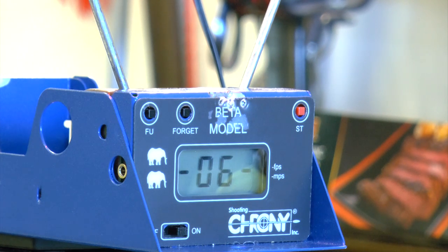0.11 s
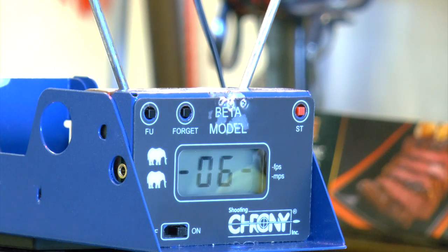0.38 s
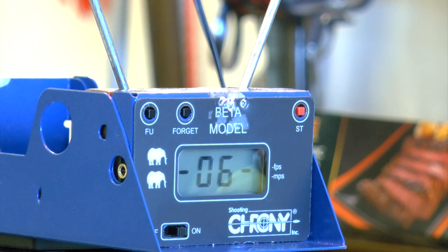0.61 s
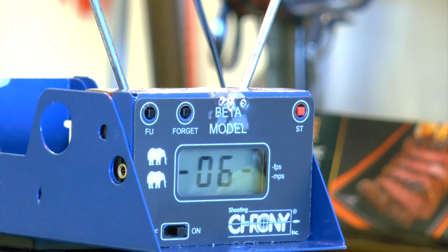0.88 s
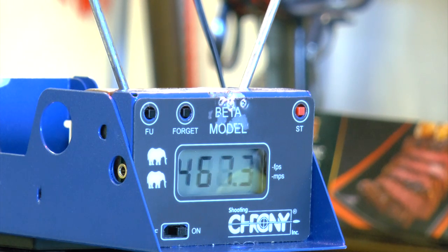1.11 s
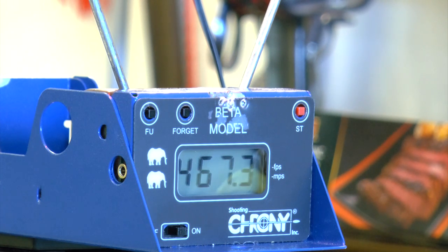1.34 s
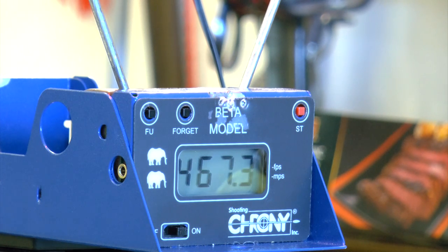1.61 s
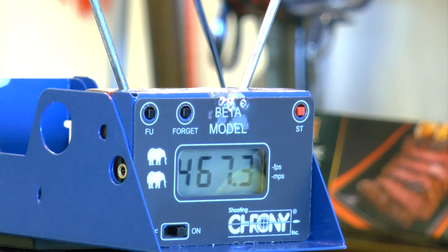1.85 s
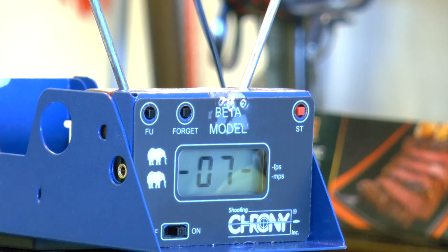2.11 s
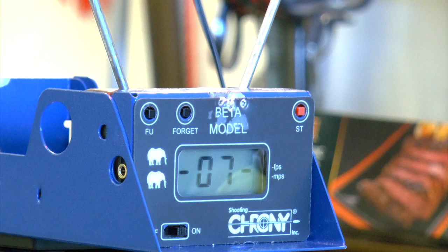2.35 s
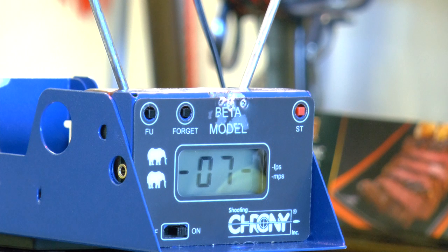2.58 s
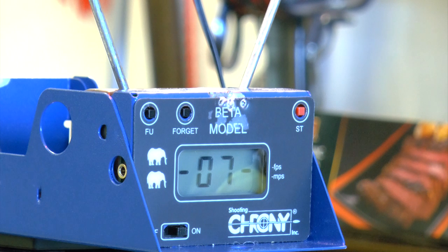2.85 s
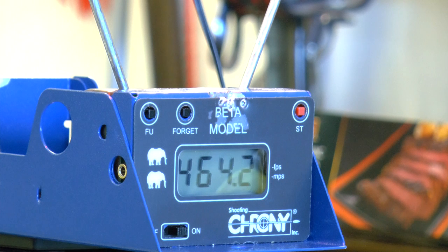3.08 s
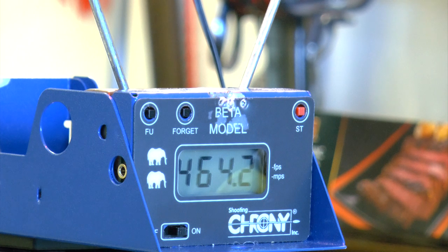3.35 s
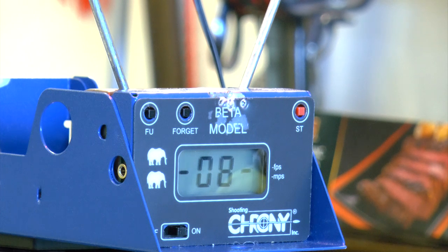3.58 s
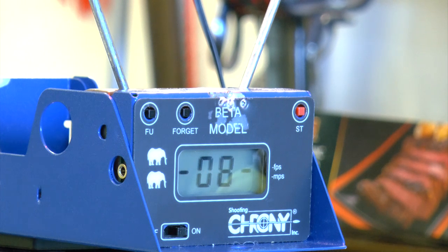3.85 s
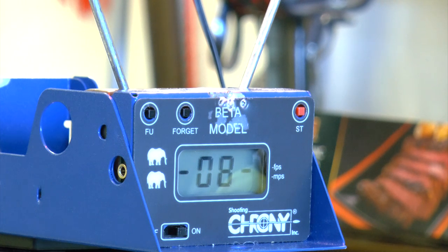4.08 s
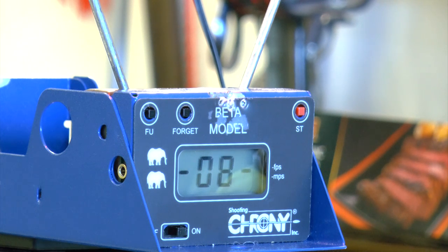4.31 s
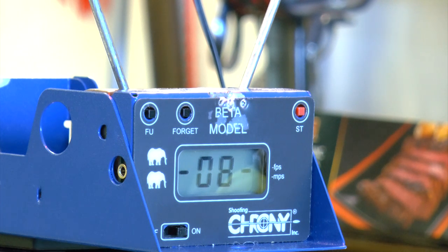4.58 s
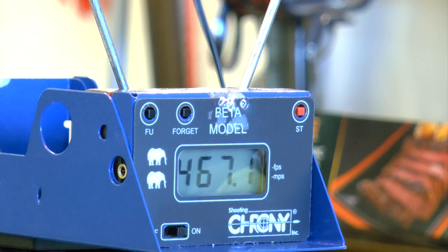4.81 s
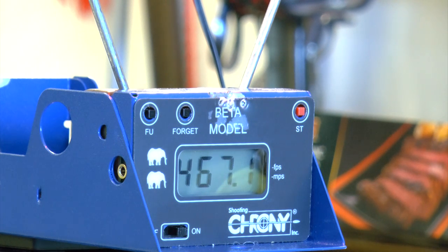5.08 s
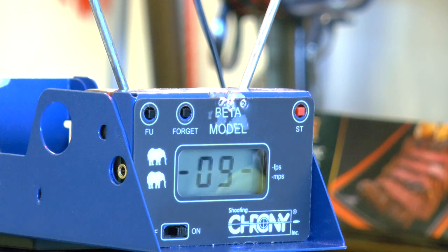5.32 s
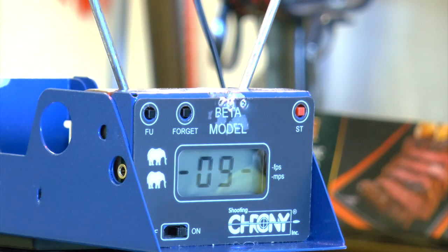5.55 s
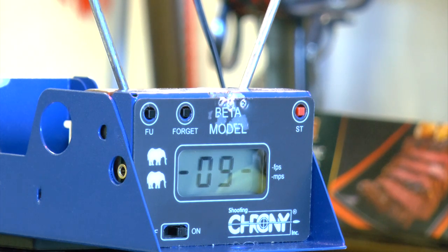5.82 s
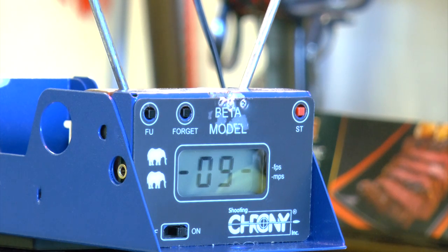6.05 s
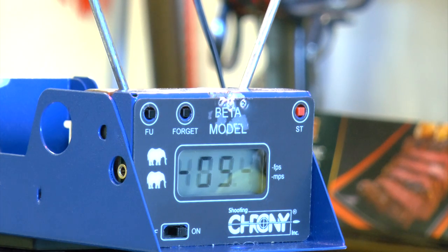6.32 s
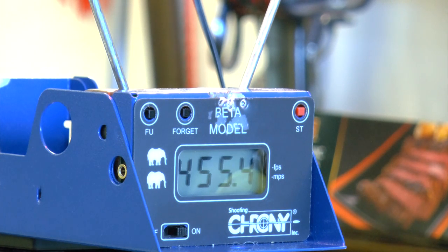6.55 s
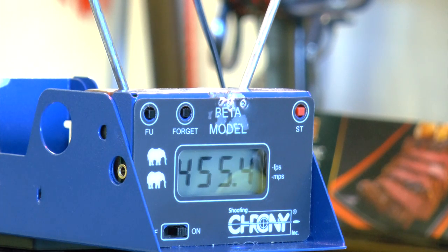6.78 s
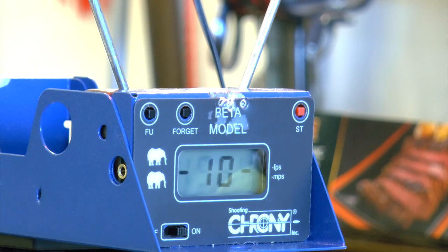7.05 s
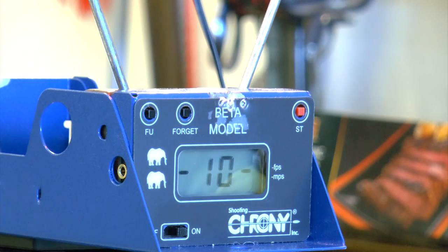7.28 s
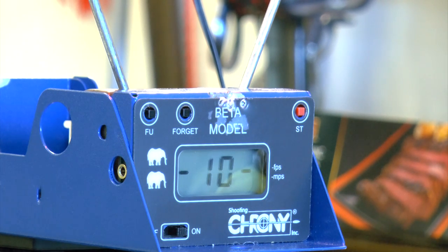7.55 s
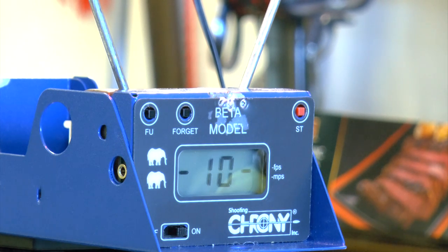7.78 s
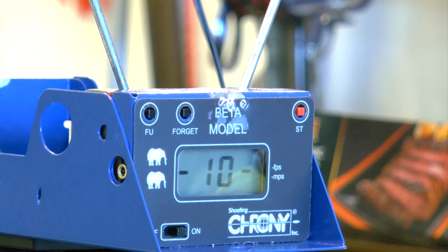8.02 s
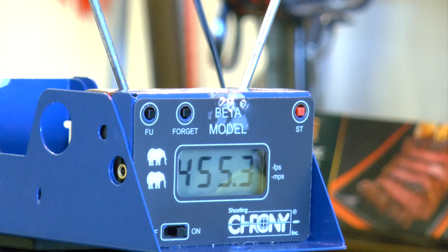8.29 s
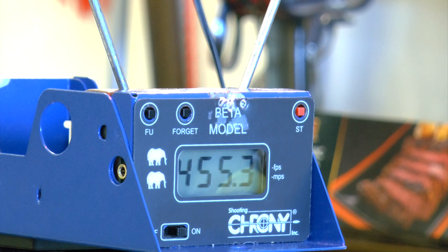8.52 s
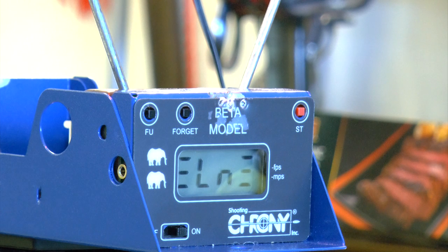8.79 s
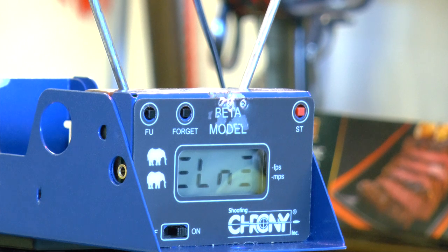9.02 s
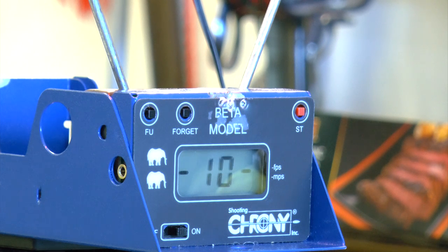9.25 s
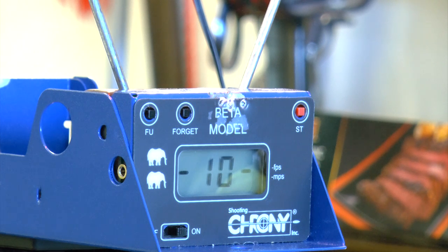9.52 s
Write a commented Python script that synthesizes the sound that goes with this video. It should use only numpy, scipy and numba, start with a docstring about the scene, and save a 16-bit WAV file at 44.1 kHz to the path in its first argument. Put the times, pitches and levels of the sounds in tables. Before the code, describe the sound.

A gas pistol is fired close to stereo microphones in a hard-walled shed, above a faint, steady rumble of distant machinery with a slight motor tone and hiss. The first crack comes almost immediately, at 0.04 s: bright, dry and hard, with a low gas puff and a short, dense reverberation. At 0.27 s the trigger resets with a crisp click. Tiny grip ticks follow. Near-identical shots come at 1.96, 3.57, 5.27, 7.08 and 9.10 s, each clicking again about a quarter second later. The puff leans left at first, right on the last shot. After the second shot, faint knocks run from 2.35 to 2.63 s; after the fourth, clearer tinny pings and wooden taps from 5.67 to 6.01 s; after the fifth, a small ring at 7.43 s and a dull tap; after the last, a sharper knock near 9.57 s. Quiet handling ticks occupy the gaps.

```python
"""A gas pistol fires six shots close to a pair of microphones in a hard-walled shed; machines hum far off throughout.
Each shot starts with a hammer click and muzzle crack, made of short noise bursts, and a puff of gas, a pressure swing.
About a quarter second later the trigger resets: a tick of noise, a short wash after it and a ring of the frame.
After four of the shots the spent ball bounces off metal and wood: noise thuds and wavering struck tones.
In the pauses the hand shifts on the grip with faint ticks. Fading noise makes the shed's reverberation."""
import sys
import numpy as np
from scipy import signal
from scipy.fft import rfft, irfft, next_fast_len
from scipy.io import wavfile
from scipy.ndimage import uniform_filter1d
from numba import njit

SR = 44100
rng = np.random.default_rng(int(sys.argv[2]) if len(sys.argv) > 2 else 0)


def volts(x):
    """Linear amplitude factor 10**(x/20) for a level x in dB, scalar or array-like."""
    e = np.asarray(x, float) / 20
    return 10 ** e


def waveform_to_disk(signal):
    """Save audio, clipped to [-1, 1], as 16-bit WAV at the path in sys.argv[1]."""
    frames = np.transpose(np.atleast_2d(signal))
    scaled = np.clip(frames, -1, 1) * 32767
    samples = np.round(scaled).astype(np.int16)
    wavfile.write(sys.argv[1], SR, samples)


N = 425124  # length in samples

# All levels are relative. left_minus_right_db is positive when the left is louder.
# A burst's rise_ms is the time from its start to its peak; t60_s is the time to fade by 60 dB.
SIDES = np.array([[1], [-1]])  # left, right

# the six shots and their gas puffs: start_s, puff_level_db, puff_left_minus_right_db
SHOTS = [(0.0429, -12.5, 14.5), (1.9601, -6.5, 8.5), (3.571, -9, 7.5), (5.2670, -4, 6), (7.0810, -6, 1),
         (9.1003, -5.5, -11)]
# bursts inside one shot: after_shot_ms, level_db, pitch_hz, width_hz, rise_ms, left_minus_right_db
SHOT_PARTS = [(0, -7.5, 5800, 4300, 1.1, -7), (0.891, -1, 7400, 3400, .5, -4),
              (3.338, 0, 4920, 200, 0.57, 7), (4.963, -17, 556, 140, 2.25, 17),
              (4.2, 0, 9540, 2200, 0.48, -11.5), (4.437, -3.5, 2690, 2110, 2.49, -3.5),
              (5.427, -6.5, 6700, 3000, 3.1, 0.5), (0.553, -14.5, 14100, 3400, 7.4, -5.5),
              (7.345, -22.5, 3100, 18000, 2.5, 1), (23.17, -25.5, 810, 260, 7, 15)]
# sharp first reflections of the shot, with the same columns:
# after_shot_ms, level_db, pitch_hz, width_hz, rise_ms, left_minus_right_db
SHOT_ECHOES = [(10.2, -7, 9500, 4000, .3, -3), (15.3, -2.5, 7500, 9000, .25, -4),
               (22.9, -1.5, 4500, 4000, .35, 0)]
SHOT_DB, SHOT_SCATTER = -4.5, .3  # added to every part's level; amount of new noise in each shot

# pressure swing of the gas puff: after_arrival_ms, width_ms, share (signed, no unit)
PUFF_SWING = [(0, .55, -.7), (1.7, .85, 1), (4.2, 1.1, -.65), (8.1, 1.6, .22)]
PUFF_DELAY_MS = 5.7
GUST_DB, GUST_WIDTH_HZ, GUST_RISE_MS = -18, 240, 8.3

# trigger snapping back: start_s, level_db, frame_ring_db
RESETS = [(0.2749, -15, -22), (2.2078, -14, -41), (3.8083, -15.5, -35), (5.5178, -12.5, -22),
          (7.3231, -14.5, -25.5), (9.3621, -14, -22.5)]
RESET_TILT_DB = 2.5  # brightness, per octave
# hand shifts and faint ticks of the mechanism: start_s, level_db, brightness_db_per_octave
SHIFTS = [(0.6871, -39.5, -6), (0.9304, -48, 2.3), (0.9827, -46, 3.5), (1.0192, -50, 0), (1.3539, -49, 3),
          (2.7754, -46, -2), (2.9968, -44.5, -0.5), (3.0058, -42.5, 5), (3.3039, -52.5, -0.5),
          (4.199, -46, -7), (4.4249, -43.5, 8), (4.4692, -49.5, -3.5), (4.508, -41.5, -1.6),
          (6.112, -48.5, -3.7), (6.203, -42.5, 3), (8.3573, -40, 0.5), (8.4073, -41, -2.2),
          (8.6028, -45, 4)]
SHIFT_RING_DB, RING_PER_TILT = -22, -1.34  # duller shifts ring the frame more: dB per dB of brightness
# basic tone colour of a click: pitch_hz, gain_db
CLICK_COLOUR = [(1000, -25), (2000, 6), (4000, 4.5), (7000, 1.5), (10000, 1), (13000, -6.5), (16000, -16)]
# hard surfaces near the pistol, relative to the tick: delay_ms, level_db, left_minus_right_db
CLICK_ECHOES = [(5.6, -2.5, 0), (11.2, -1.5, -1)]
WASH_DB, WASH_RISE_MS = -18, 13.4  # a short wash of noise follows each tick
# ringing tones of the pistol frame: pitch_hz, level_db, t60_s
FRAME = [(2155, 0, 0.11), (1806, -7, 0.096), (2444, -7.5, 0.14), (3570, -9, 0.03)]

# the ball on dull surfaces: start_s, level_db, thud_pitch_hz, tick_over_thud_db
KNOCKS = [(2.4034, -44, 11000, -16), (2.449, -36, 1370, -12), (2.565, -36, 1260, -5),
          (2.6272, -27.5, 2250, -20.5), (5.7778, -25.5, 2510, -9.5), (5.8692, -38.5, 920, -5),
          (6.0107, -37.5, 2000, -12), (7.55, -46, 2000, -9), (9.5711, -30.5, 4440, -6),
          (9.5776, -20, 4360, -12)]
THUD_WIDTH, THUD_CYCLES = 1.3, 1.4  # width as a share of the pitch; rise in cycles of the pitch
TICK_HZ, TICK_WIDTH_HZ, TICK_RISE_MS = 7800, 11000, 1
# short tones of a struck board: multiple_of_thud_pitch (no unit), level_db, t60_cycles of the thud pitch
BOARD = [(.45, -20, 40), (.78, -15, 80), (1.05, -12, 80), (1.5, -17, 70), (2.3, -21, 110)]
# ringing tones of four metal things the ball strikes: pitch_hz, level_db, t60_s
CAN = [(3325, -1, .19), (5865, -15, .15), (6545, -2, .25), (8120, -9, .25), (9945, 0, .13),
       (11490, -18, .15), (12890, -10, .17), (15090, -16, .12), (15515, -16, .1)]
PLATE = [(3610, 6, 0.163), (3600, -4, 0.11), (4900, -30.5, .12), (6600, 2, 0.065), (9800, -19, .05),
         (10060, 3, .05)]
RODS = [(2169, -2, .2), (3700, -11, .2), (4100, -9, .15), (5030, -11, .08), (6200, -10, .12),
        (8915, -9, .13), (9600, -10, .1), (10000, -9, .07), (11070, -12, .1), (12000, -14, .12),
        (15180, -16, .1)]
BRACKET = [(6400, 1, .1), (7200, -6, 0.11), (10000, -9, 0.036), (13950, -11, 0.13)]
# the ball on metal: start_s, object (tone table), level_db, brightness_db_per_octave
BLOWS = [(2.3535, PLATE, -52.5, -2), (2.521, BRACKET, -47, -3), (5.6715, CAN, -29.5, -3.7),
         (5.8929, RODS, -44, 2), (5.9289, RODS, -37.5, 1.2), (7.4335, CAN, -33, -2.8),
         (9.4943, PLATE, -47.5, 2.3), (9.5776, PLATE, -38.5, -12)]
# floor and walls near the ball: delay_ms, level_db
BALL_ECHOES = [(3.6, -4), (8.3, -6), (14.5, -11)]

# reverberation of the shed: pitch_hz, t60_s, level_db, side_minus_mid_db
SHED = [(100, 0.17, -31, 4), (295, 0.57, -8.5, -14), (890, 0.77, -11.5, -5), (1070, 0.87, -5, -11),
        (2000, 0.73, -10, -8), (3430, 0.65, -8.5, -10.5), (4800, 0.6, -10, -17.5), (5840, 0.6, -12.5, -18),
        (9000, 0.5, -11.5, -8), (11860, 0.4, -13.5, -1.5), (16000, 0.42, -18.5, -2.5)]
NEAR_DB, NEAR_T60_S = 2, 0.28  # things close by scatter a first, short wash: level over the long tail
# uneven scatter of near sound by the microphones' casing: pitch_hz, relative_side_db
CASING = [(60, -3.5), (110, -1), (200, -5.5), (380, 4.5), (700, -9.5), (1290, -1.5), (2380, -8),
          (4400, -13), (8120, -9), (15000, 7)]
# the table top under the microphones lifts and hollows the low middle: pitch_hz, gain_db
TABLE_TOP = [(200, 0.5), (350, -2), (550, -2.5), (780, 4.5), (1000, -9), (1300, -10.5), (1900, -2),
             (4200, -1.5), (5000, -0.5), (6500, -1.5)]

# broad machine rumble: pitch_hz, level_db per Hz
HUM = [(15, -46.5), (25, -14.5), (76, -8), (145, -4), (206, -2), (256, -7.5), (293, -4), (516, -14),
       (560, -7.5), (641, -22.5), (775, -18.5), (1290, -25), (1740, -19), (6920, -40.5), (16000, -45)]
HUM_DB = -51.5
# stereo width of the rumble: pitch_hz, relative_side_db
HUM_SIDE = [(60, -10), (110, -13), (200, -17), (380, -14.5), (700, -11.5), (1290, -18), (2380, -17),
            (4400, -24.5), (8120, -7.5), (15000, 0.5)]
# blurred motor tones and a band of hiss: pitch_hz, width_hz, level_db
MOTORS = [(44.3, 14, -65.5), (82, 29, -57.5), (205.4, 5.6, -59.5), (751, 96, -67), (1421, 40, -74.5),
          (2820, 1300, -67.5)]
WHINE_HZ, WHINE_DB = 551, -63  # one steadier motor tone

TOP_HZ = 15800  # the sound is cut above this


def curve(table, hz, column=1):
    """Read a table at any frequency, straight on a log axis."""
    rows = np.array(table, float)
    return np.interp(np.log(hz + 1), np.log(rows[:, 0] + 1), rows[:, column])


def colour(x, table):
    """Shape a sound by a table of pitch_hz and gain_db."""
    length = x.shape[-1]
    size = next_fast_len(length)
    gain = volts(curve(table, np.fft.rfftfreq(size, 1 / SR)))
    return irfft(rfft(x, size) * gain, size)[..., :length]


def band(x, hz, width_hz):
    """Keep a bell-shaped band of a sound, at rms 1."""
    f = np.fft.rfftfreq(x.shape[-1], 1 / SR)
    bell = np.exp(-2 * ((f - hz) / width_hz) ** 2)
    y = irfft(rfft(x) * bell, x.shape[-1])
    return y / y.std()


def add(out, s, sound):
    """Mix a sound in at a time in seconds."""
    i = int(s * SR)
    room = max(out.shape[-1] - i, 0)
    out[..., i:i + sound.shape[-1]] += sound[..., :room]


def pan(db):
    """Left and right gains from the left minus right level."""
    return volts(db / 2 * SIDES)


def walk(rate):
    """Slow random drift, spread 1, from smoothed random steps at a rate per second."""
    k = int(SR / rate)
    steps = np.repeat(rng.standard_normal(N // k + 1), k)
    smooth = uniform_filter1d(uniform_filter1d(steps, k), k)[:N]
    return smooth / smooth.std()


def repeat(x, echoes):
    """Add delayed copies of a sound, as reflections do."""
    out = x.copy()
    for ms, db in echoes:
        add(out, ms / 1000, volts(db) * x)
    return out


def burst(noise, hz, width_hz, rise_ms):
    """A quick swell of band noise with a set energy."""
    u = np.arange(len(noise)) / (rise_ms * SR / 1000)
    shape = u * np.exp(1 - u)
    y = shape * band(noise, hz, width_hz)
    return y * np.sqrt(np.sum(shape ** 2) / np.sum(y ** 2) / 2)


def pulse(hz, width_hz, rise_ms):
    """What a burst sends to the walls: the same energy with an even spectrum, as all directions add up."""
    y = band(signal.unit_impulse(1024, 128), hz, width_hz)
    return y * np.e * np.sqrt(rise_ms * SR / 8000 / len(y))


def ring(modes, tilt_db, rough=1.7):
    """Struck tones; each line wavers and widens at random."""
    t, out = np.arange(SR // 2) / SR, 0
    for hz, db, t60 in modes:
        swell, slip = (band(rng.standard_normal(len(t)), 0, 100.0) for _ in range(2))
        level = volts(db + tilt_db * np.log2(hz / 6000) - 60 * t / max(t60, .02))
        # an extra push at the start, then a wavering fade
        level = level * volts(3 * swell + 5 * np.exp(-t / .012))
        out = out + level * np.sin(2 * np.pi * hz * t + rough * slip)
    return out * np.minimum(t / 0.00039, 1)  # soft start


def shots():
    """Noise bursts, nearly alike in each shot; returns the direct sound and what reaches the walls."""
    out, send = np.zeros((2, N)), np.zeros(N)
    parts = SHOT_PARTS + SHOT_ECHOES
    usual = rng.standard_normal((len(parts), 2048))  # noise shared by all the shots
    for s, *_ in SHOTS:
        for (ms, part_db, hz, width, rise_ms, pan_db), noise in zip(parts, usual):
            start, gain = s + ms / 1000, volts(SHOT_DB + part_db)
            part = burst(noise + SHOT_SCATTER * rng.standard_normal(2048), hz, width, rise_ms)
            add(out, start, gain * pan(pan_db) * part)
            add(send, start, gain * pulse(hz, width + 1500, rise_ms))
    return out, send


def puffs():
    """The gas jet buffets each microphone port with a pressure swing and a low gust."""
    out, ms = np.zeros((2, N)), np.arange(1500) * 1000 / SR
    swing = 0
    for at, width, share in PUFF_SWING:
        swing = swing + np.exp(-.5 * ((ms - PUFF_DELAY_MS - at) / width) ** 2) * share
    for s, db, pan_db in SHOTS:
        add(out, s, volts(db) * pan(pan_db) * swing)
        for port in out:  # separate noise at each port
            gust = burst(rng.standard_normal(8192), 20, GUST_WIDTH_HZ, GUST_RISE_MS)
            add(port, s + .002, volts(GUST_DB) * gust)
    return out


def clicks():
    """Short ticks of the mechanism, each with echoes, a wash of noise and a ring of the frame."""
    out, send = np.zeros((2, N)), np.zeros(N)
    ticks = [(s, db, RESET_TILT_DB, ring_db) for s, db, ring_db in RESETS]
    ticks += [(s, db, tilt_db, SHIFT_RING_DB + RING_PER_TILT * tilt_db) for s, db, tilt_db in SHIFTS]
    for s, db, tilt_db, ring_db in ticks:
        shape = [(hz, d + tilt_db * np.log2(hz / 6000)) for hz, d in CLICK_COLOUR]
        # the tick itself, then its echoes, each with new noise
        for ms, echo_db, pan_db in [(0, 0, 0)] + CLICK_ECHOES:
            tick = colour(burst(rng.standard_normal(1024), 9300, 24000, 0.95), shape)
            add(out, s + ms / 1000, volts(db - 5.5 + echo_db) * pan(pan_db - 5.5) * tick)
        wash = colour(burst(rng.standard_normal(8192), 4500, 12000, WASH_RISE_MS), CLICK_COLOUR)
        add(out, s, volts(db + WASH_DB) * pan(-2.5) * wash)
        add(send, s, volts(db - 0.5) * colour(pulse(6700, 30000, 0.17), shape))
        frame = volts(db + ring_db) * ring(FRAME, 0, rough=2.2)
        add(out, s, volts(3.0) * pan(-2.0) * frame)
        add(send, s, frame)
    return out, send


def bounces():
    """The spent ball knocks on dull things and rings metal ones, a little left."""
    out, send = np.zeros(N), np.zeros(N)
    hits = [(s, db, hz, THUD_WIDTH * hz, 1000 * THUD_CYCLES / hz) for s, db, hz, _ in KNOCKS]
    ticks = [(s, db + tick_db) for s, db, _, tick_db in KNOCKS]
    ticks += [(s, db) for s, _, db, _ in BLOWS]
    hits += [(s, db, TICK_HZ, TICK_WIDTH_HZ, TICK_RISE_MS) for s, db in ticks]
    for s, db, hz, width, rise_ms in hits:
        add(out, s, volts(db) * burst(rng.standard_normal(2048), hz, width, rise_ms))
        add(send, s, volts(db + 1.0) * pulse(hz, width, rise_ms))
    for s, db, hz, _ in KNOCKS:
        body = [(hz * ratio, mode_db, cycles / hz) for ratio, mode_db, cycles in BOARD]
        add(out, s, volts(db) * ring(body, 0, rough=.8))
    out = repeat(out, BALL_ECHOES)
    for s, modes, db, tilt_db in BLOWS:
        metal = volts(db) * ring(modes, tilt_db)
        add(out, s, metal)
        add(send, s, volts(-10.0) * metal)
    return out * pan(1.3), send


def shed(x, build_ms):
    """Dense reflections build up quickly and fade faster in the treble than in the middle."""
    t, tail = np.arange(36000) / SR, 0
    for hz in 70 * 2 ** np.arange(0, 8, 1 / 3):  # third-octave steps
        mid, side = (band(rng.standard_normal(len(t)), hz, hz / 4) for _ in range(2))
        fade = volts(-60 * t / curve(SHED, hz)) + volts(NEAR_DB - 60 * t / NEAR_T60_S)
        # the root gives wider bands their larger share of the power
        fade = fade * volts(curve(SHED, hz, column=2) - 2.0) * np.sqrt(hz / SR / 400)
        tail = tail + fade * (mid + volts(curve(SHED, hz, column=3)) * side * SIDES)
    tail = tail * (1 - np.exp(-t * 1000 / build_ms))
    return signal.fftconvolve(x[None], tail)[:, :N]


def casing(x):
    """A short scatter, opposite in the two ports, makes the treble differ left and right."""
    scatter = rng.standard_normal(256) * np.exp(-np.arange(256) / 60)
    scatter = scatter / np.sqrt(np.sum(scatter ** 2))
    side = colour(signal.fftconvolve(x.mean(0), scatter)[:N], CASING)
    return x + volts(-4.0) * side * SIDES


def hum():
    """Distant machines: broad rumble whose bass wavers, a few blurred motor tones and a band of hiss."""
    broad = colour(rng.standard_normal(N), HUM)
    side = colour(colour(rng.standard_normal(N), HUM), HUM_SIDE)
    low = signal.sosfilt(signal.butter(1, 300, fs=SR, output="sos"), broad)
    wavering = broad + low * (volts(2.5 * walk(6)) - 1)
    mid = volts(HUM_DB) / broad.std() * wavering
    for hz, width, db in MOTORS:
        mid = mid + volts(db + 1.3 * walk(1.1)) * band(rng.standard_normal(N), hz, width)
    turns = np.cumsum(WHINE_HZ + 1.5 * walk(3)) / SR  # the pitch drifts slightly
    mid = mid + volts(WHINE_DB + 2.0 * walk(5.1)) * np.sqrt(2) * np.sin(2 * np.pi * turns)
    return pan(-.8) * (mid + volts(HUM_DB + 2.0) / broad.std() * side * SIDES)


def scene():
    """Near sounds and their room, coloured by the table top, with the gas on the ports and the hum."""
    near, sends = zip(shots(), clicks(), bounces())
    in_room = casing(sum(near)) + shed(sum(sends), build_ms=0.45)
    return volts(1.0) * (colour(in_room, TABLE_TOP) + puffs()) + hum()


@njit
def follow(x, rise, fall):
    """Level follower with quick rise and slow fall."""
    out, e = np.empty(len(x)), 1e-4
    for i in range(len(x)):
        e += (x[i] - e) * (rise if x[i] > e else fall)
        out[i] = e
    return out


def duck(x, top_db, slope, rise_s, fall_s, most_db):
    """Gain control: turns down what passes the threshold, both channels together."""
    level = follow(np.abs(x).max(0), 1 / (rise_s * SR), 1 / (fall_s * SR))
    return x * np.clip((volts(top_db) / level) ** slope, volts(most_db), 1)


def low_pass(x):
    """Removes everything above the highest recorded frequency."""
    return signal.sosfilt(signal.butter(12, 17010, fs=SR, output="sos"), x)


def record(dry):
    """A slow level control, a quicker limiter and a steep cut of the top."""
    x = duck(dry, top_db=-43.0, slope=0.13, rise_s=0.0071, fall_s=0.2, most_db=-3.0)
    x = duck(x, top_db=-22.5, slope=0.43, rise_s=0.0022, fall_s=0.086, most_db=-14)
    mix = signal.sosfilt(signal.ellip(6, .3, 32, TOP_HZ, fs=SR, output="sos"), x)
    return low_pass(mix)


dry = scene()
out = record(dry)
waveform_to_disk(out)
```